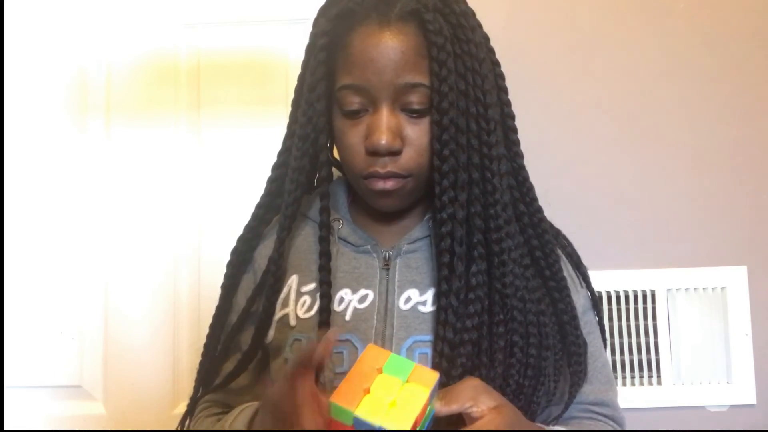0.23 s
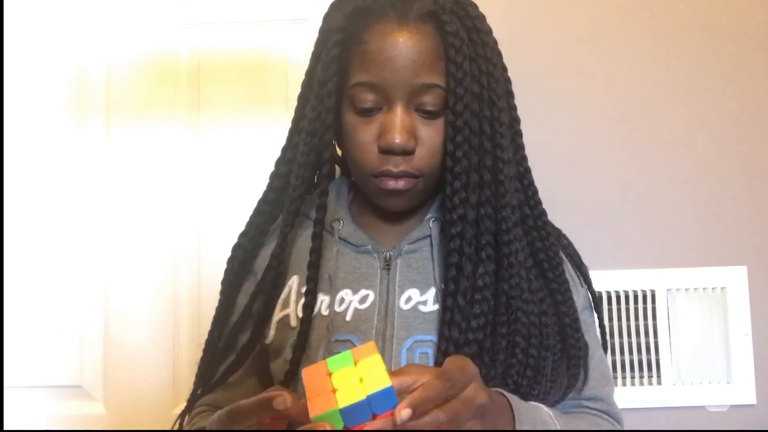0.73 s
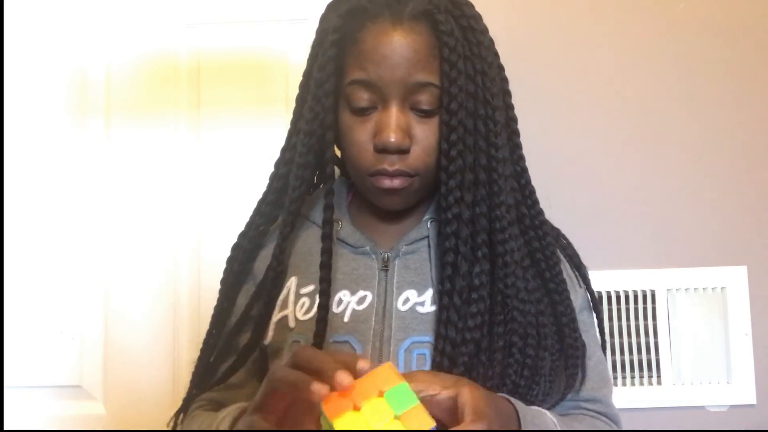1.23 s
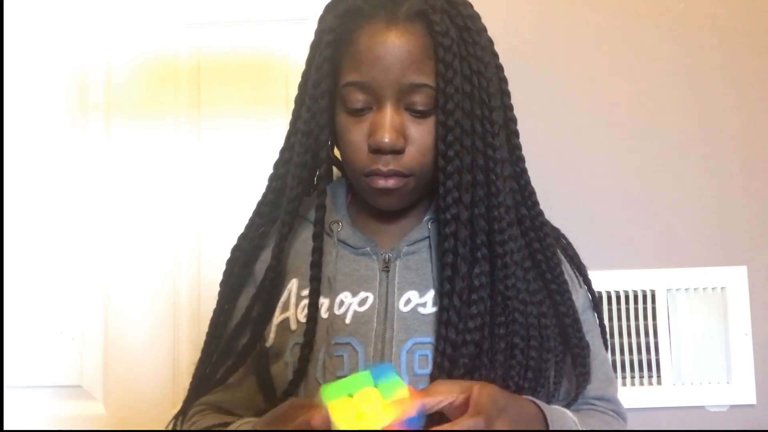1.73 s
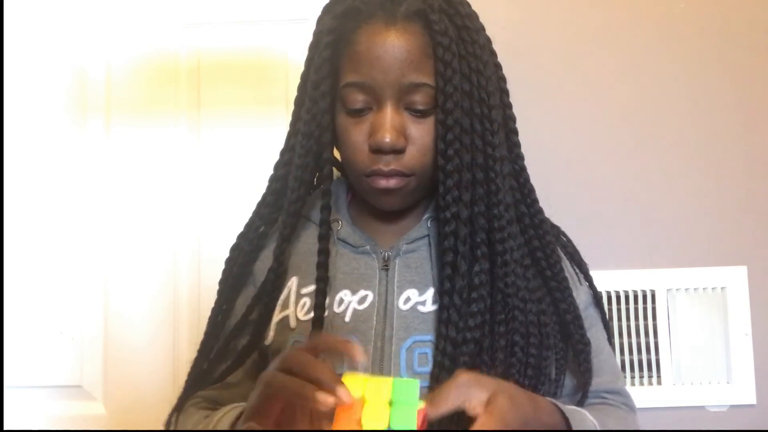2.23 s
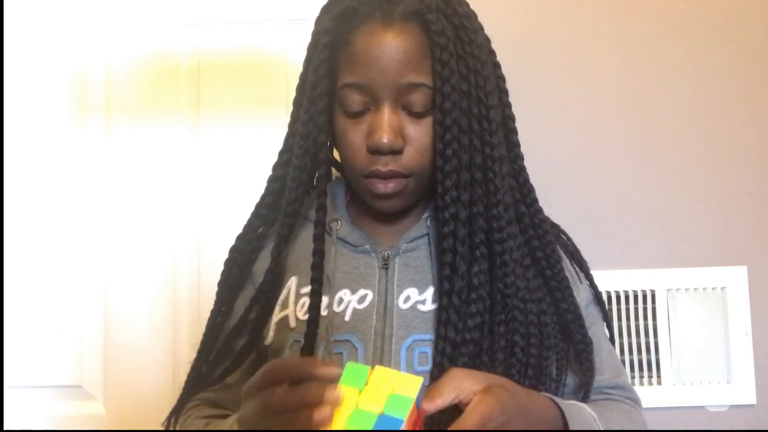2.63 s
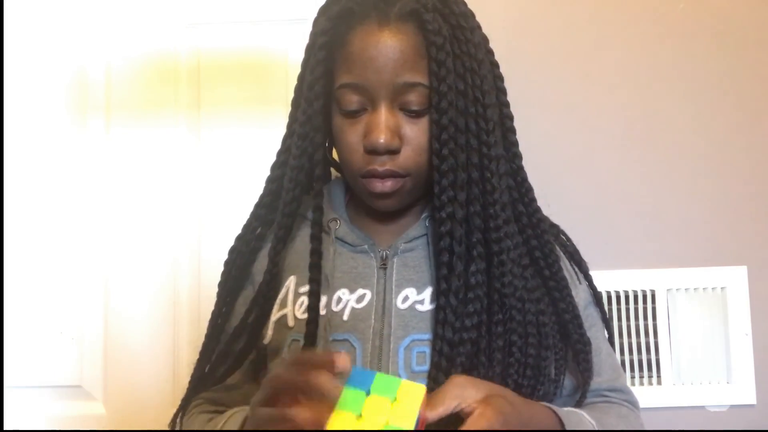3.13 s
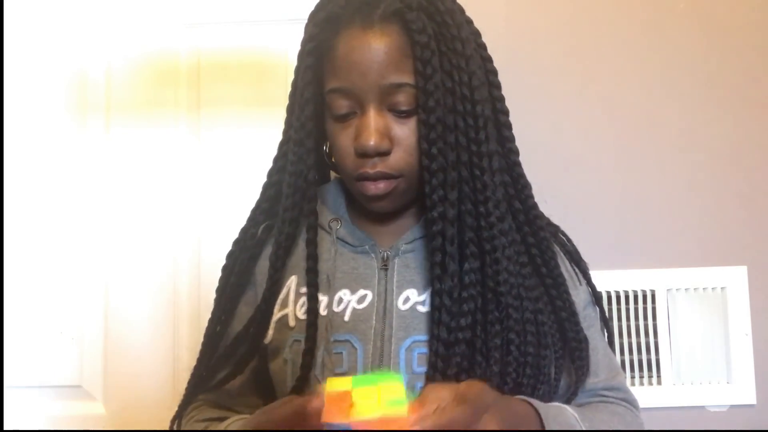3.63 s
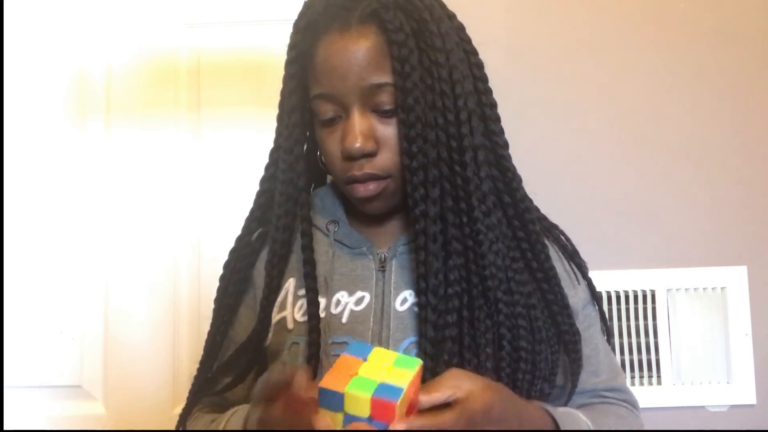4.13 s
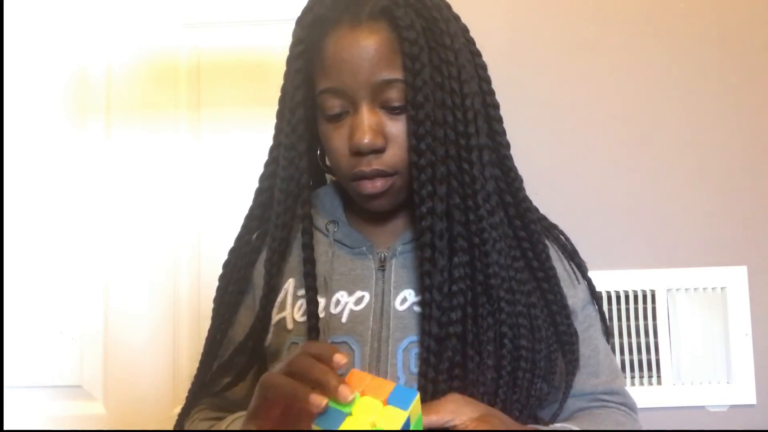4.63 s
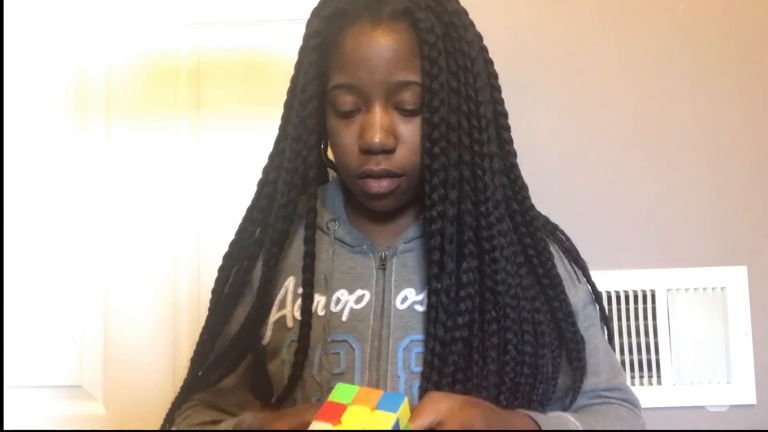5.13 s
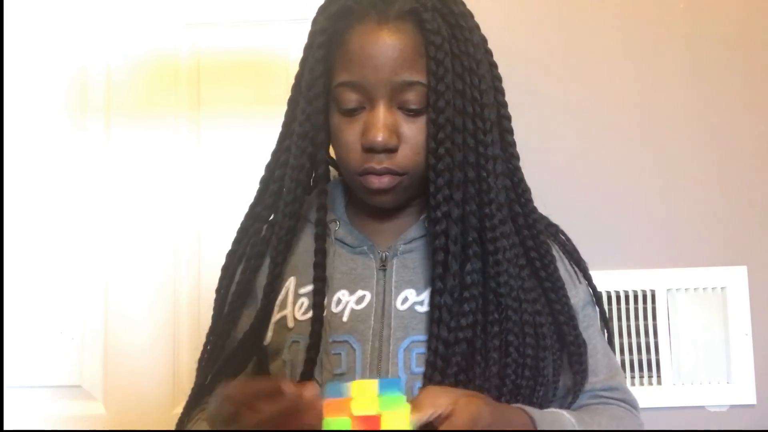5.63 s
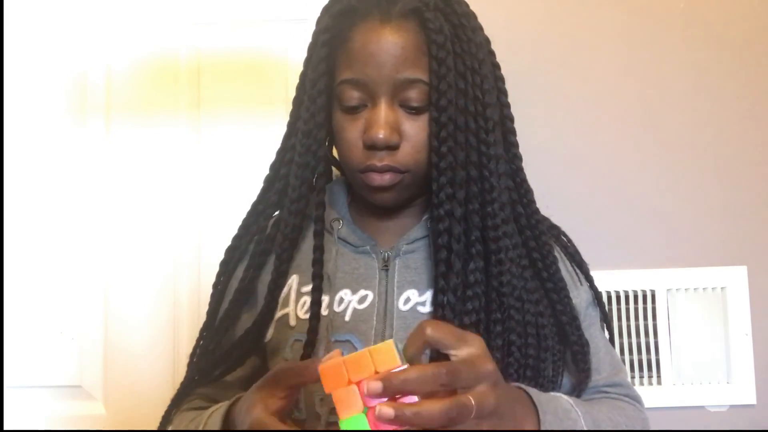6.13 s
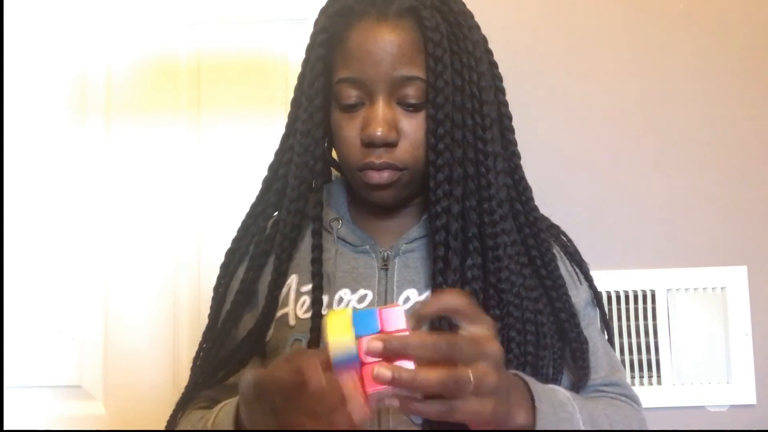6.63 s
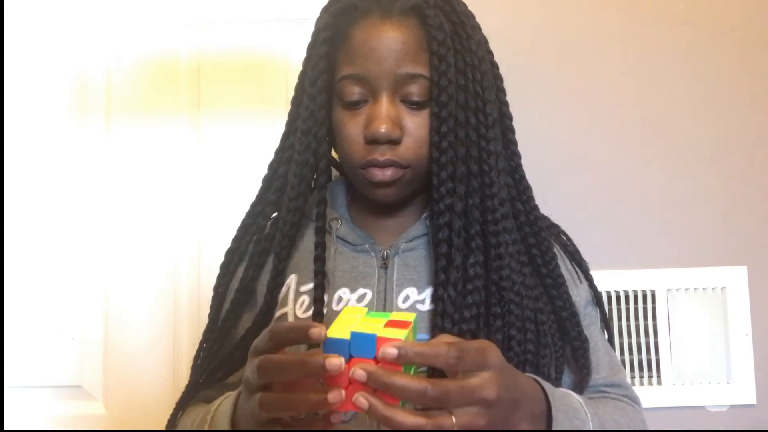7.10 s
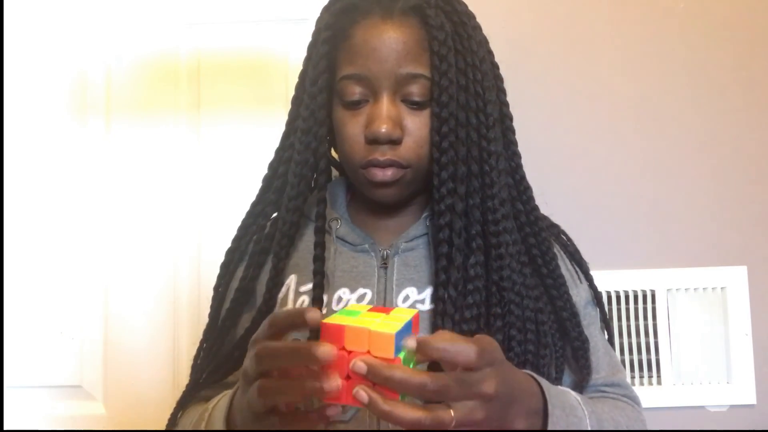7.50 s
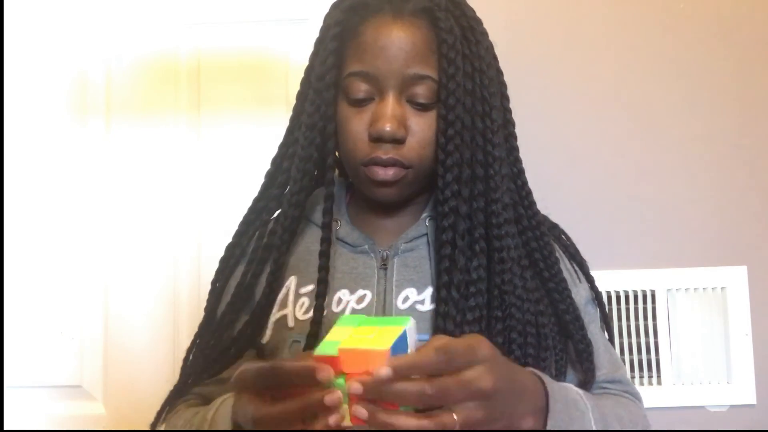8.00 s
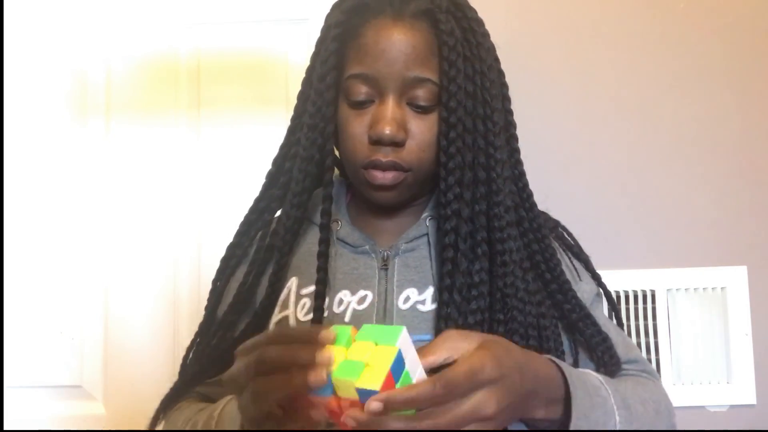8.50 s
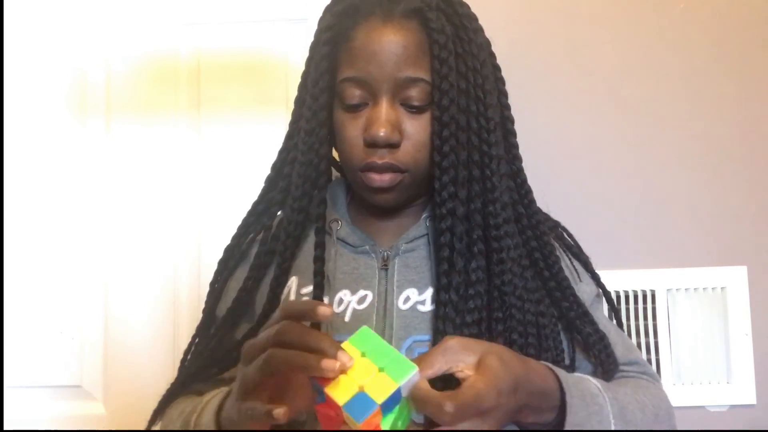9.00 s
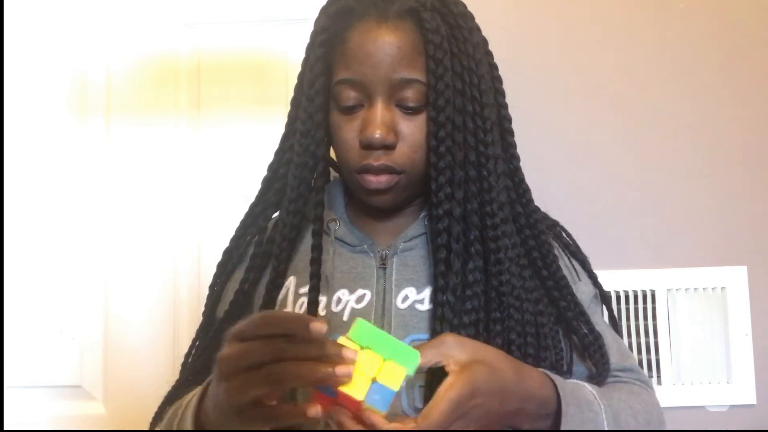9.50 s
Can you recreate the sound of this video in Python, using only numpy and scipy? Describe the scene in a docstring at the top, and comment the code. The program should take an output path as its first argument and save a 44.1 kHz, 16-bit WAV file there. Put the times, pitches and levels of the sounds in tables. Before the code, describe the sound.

Hands work a plastic speed cube indoors, heard very close. It starts nearly silent, with faint grip ticks over soft rumble. One quick turn clicks, then bursts of bright, dry clacks and scraping layer rattles come fast, pausing around four and a half, seven and seven and a half seconds. Hiss rises slightly during long flurries and a very faint low hum appears late. A lone sharp clack comes near the end.

```python
"""A low room rumble and thin hiss come first, with faint ticks of loose plastic as fingers shift their grip.
Then a plastic speed cube is solved in quick flurries, close to a small microphone in an ordinary room.
Each turn is a fine rattle of sliding pieces, made of tiny random contacts, with sharp noise-burst clacks
as pieces catch and seat; both are coloured by the plastic and answered by short, changing echoes.
The hiss, shaped noise, steps up during the long flurries; a faint wavering sine hums briefly late on."""
import sys
import numpy as np
from scipy import signal
from scipy.fft import rfft, irfft
from scipy.io import wavfile
from scipy.ndimage import uniform_filter1d

SR = 44100
rng = np.random.default_rng(int(sys.argv[2]) if len(sys.argv) > 2 else 0)


def wav_record(signal):
    """Record a signal, one row per channel, as 16-bit PCM in the file named by sys.argv[1]."""
    frames = np.transpose(np.atleast_2d(signal))
    bounded = np.clip(frames, -1, 1)
    # unit amplitude maps onto the largest positive 16-bit level
    quanta = np.round(bounded * 32767).astype(np.int16)
    wavfile.write(sys.argv[1], SR, quanta)


N = 429975  # length in samples


def amp(db):
    """Decibels to gain."""
    return 10 ** (np.asarray(db) / 20)


def evened(x):
    """Scales to rms 1."""
    return x / np.sqrt(np.mean(x ** 2) + 1e-20)


def read(points, hz):
    """Reads a table on a log-frequency axis."""
    f, value = np.transpose(points)
    return np.interp(np.log(hz + 1), np.log(f), value)


def add(mix, s, sound):
    """Mixes a sound in at time s."""
    part = mix[max(round(s * SR), 0):][:len(sound)]
    part += sound[:len(part)]


def noise(points):
    """Steady noise of the given colour, rms 1."""
    spectrum = rfft(rng.standard_normal(N))
    gain = amp(read(points, np.fft.rfftfreq(N, 1 / SR)))
    return evened(irfft(spectrum * gain, N))


# colour of the quiet background: [pitch_hz, relative_level_db_per_hz]
FLOOR_COLOUR = [(15, -37.5), (30, -16.5), (52, -3.5), (100, -5.5), (200, -15), (500, -19.5), (1100, -24),
                (2500, -30.5), (4200, -31.5), (4900, -36), (6300, -32), (10300, -41.5), (11800, -37.5),
                (16000, -39.5)]
FLOOR_DB = -52  # rms level of the background before its rumble swells
# stretches of louder hiss: [start_s, end_s, level_db]
HISS_SPANS = [(2.198, 4.405, -49), (5.263, 7.025, -48), (8.226, 9, -46.5)]
# colour of that hiss: [pitch_hz, relative_level_db_per_hz]
HISS_COLOUR = [(60, -0.5), (160, -1), (330, 1.5), (700, -4), (1500, -7), (3500, -9), (4900, -10.5),
               (6500, -9.5), (10300, -16.5), (11500, -17), (16000, -23.5)]


def background(fade_s=0.028, swell_db=0.5, rumble_hz=200):
    """An uneven room rumble under a thin hiss; the hiss steps up and drops back."""
    lift = np.zeros(N)
    for start, end, db in HISS_SPANS:
        length = end - start
        add(lift, start, amp(db) * signal.windows.tukey(round(length * SR), 2 * fade_s / length))
    air = amp(FLOOR_DB) * noise(FLOOR_COLOUR)
    lowpass = signal.butter(2, rumble_hz, fs=SR, output="sos")
    rumble = signal.sosfiltfilt(lowpass, air)
    wander = evened(uniform_filter1d(rng.standard_normal(N), size=6000))
    swell = amp(swell_db * wander)
    return air + (swell - 1) * rumble + lift * noise(HISS_COLOUR)


def causal(db):
    """Minimum-phase spectrum with this gain: it rings only after the blow."""
    log_gain = np.log(amp(db))
    circle = np.concatenate([log_gain, log_gain[-2:0:-1]])
    return np.exp(np.conj(signal.hilbert(circle)))[:len(db)]


# what the hollow plastic pieces radiate: [pitch_hz, relative_level_db_per_hz]
PLASTIC = [(100, -35), (300, -20.5), (550, -17), (820, -15.5), (1050, -6), (1900, -5), (3800, -3.5),
           (5000, -4), (6500, 1), (8500, -4), (9600, -7.5), (10300, -12.5), (11300, -10), (15800, -19)]
# broad resonances of the cube: [pitch_hz, width_hz, lift_db]
SHELL = [(660, 150, 7.5), (1400, 280, 1.5), (2850, 520, 4), (6430, 5400, 0.5)]


def cube(tilt_db, size=1024, pivot_hz=4500, low_hz=1400, high_hz=10000):
    """The cube's response; a harder contact tips it towards the treble, in dB per octave."""
    hz = np.fft.rfftfreq(size, 1 / SR)
    shell = sum(db / (1 + (2 * (hz - f) / width) ** 2) for f, width, db in SHELL)
    octaves = np.log2(np.clip(hz, low_hz, high_hz) / pivot_hz)
    return causal(read(PLASTIC, hz) + shell + tilt_db * octaves)


def ticks(per_s, spread_db, tilt_db, snap_s=.0006, count=20, size=1024):
    """A random train of tiny contacts of uneven size, spread over many pieces, rms 1."""
    decay = np.exp(-np.arange(size) / SR / snap_s)
    sizes = amp(spread_db * np.minimum(rng.exponential(1, N), 3))
    hits = (rng.random(N) < per_s / SR) * sizes
    piece = rng.integers(0, count, N)
    out = np.zeros(N)
    for k in range(count):
        burst = rng.standard_normal(size) * decay
        tick = irfft(rfft(burst) * cube(tilt_db))
        out += signal.oaconvolve(hits * (piece == k), evened(tick))[:N]
    return evened(out)


def handling(level_db=-69):
    """Loose pieces tick faintly as the fingers shift their grip."""
    return amp(level_db) * ticks(per_s=45, spread_db=-5.5, tilt_db=-0.5)


# the room's decay, as the time to fall 60 dB: [pitch_hz, t60_s]
ROOM_DECAY = [(300, 0.19), (3500, 0.21), (8000, 0.2), (15000, 0.17)]
# the colour of the room's diffuse tail: [pitch_hz, relative_level_db]
ROOM_COLOUR = [(200, 1.5), (1200, -3), (8500, -5), (11000, -6), (16000, -0.5)]


def echoes(early_db=-15, early_s=.0095, early_decay_s=0.0072, tail_db=-14, tail_s=.006):
    """A cluster of echoes from the nearest surfaces, and a short diffuse tail that dies by frequency."""
    t = np.arange(SR // 2) / SR
    # sparse random reflections
    near, far = rng.standard_normal((2, len(t))) * (rng.random((2, len(t))) < .12)
    near = near * np.exp(-t / early_decay_s)
    hz, age, z = signal.stft(far, SR, nperseg=256)
    colour_db = read(ROOM_COLOUR, hz)[:, None]
    decay_db = 60 * age / read(ROOM_DECAY, hz)[:, None]
    far = signal.istft(z * amp(colour_db - decay_db), SR, nperseg=256)[1]
    echo = np.zeros(SR // 2)
    add(echo, early_s, amp(early_db) * near / np.linalg.norm(near))
    add(echo, tail_s, amp(tail_db) * far / np.linalg.norm(far))
    return echo


def room(x, count=7):
    """The cube moves in the hands, so the sound crossfades round a ring of echo patterns."""
    place = np.arange(N) / SR * count / 2  # once round in 2 s
    shares = [np.sqrt(np.maximum(1 - abs((place - k) % count - 1), 0)) for k in range(count)]
    return sum(signal.oaconvolve(x * share, echoes())[:N] for share in shares)


def clacks(contacts, skid_db=-15, skid_s=0.0015, snap_s=0.0007, ring_s=0.0047, ring_db=-21,
           rise_s=0.00042, tilt_db=1.15, size=1536):
    """A piece skids, snaps home and its neighbours shiver. Rows: towards the microphone, into the room."""
    t = (np.arange(size) - size // 4) / SR
    out = np.zeros((2, N))
    age = np.maximum(t, 0)
    skid = amp(skid_db) * np.exp(-abs(t) / skid_s)
    shiver = amp(ring_db) * np.exp(-age / ring_s)
    strike = (1 - np.exp(-age / rise_s)) * (np.exp(-age / snap_s) + shiver)
    chatters = rng.standard_normal((len(contacts), size))
    for (s, db, bright), chatter in zip(contacts, chatters):
        colour = cube(bright + tilt_db, size=size)
        clack = irfft(rfft(chatter * (rng.random() * skid + strike)) * colour)
        loudest = np.sqrt(uniform_filter1d(clack ** 2, size=66).max())  # rms over 1.5 ms
        clack *= amp(db) / loudest
        add(out[0], s + t[0], clack)
        # summed over all directions the chatter's peaks and dips mostly even out, leaving the plastic's colour
        add(out[1], s, 0.66 * np.std(clack) * evened(irfft(colour)))
        add(out[1], s + t[0], 0.74 * clack)
    return out


# the clacks that stand out, as a layer catches or seats: [start_s, level_db, brightness_db_per_octave]
# level is that of the loudest moment; brightness comes before the tilt that all clacks share
CLACKS = [(.219, -40, -2.5), (.468, -48, -3.5), (0.656, -42, -1), (0.9983, -14.5, -5), (1.0128, -21, 9),
          (1.0276, -5.5, 2), (1.0411, -16.5, 0.5), (1.137, -32, -1), (1.19, -36.5, -6), (1.315, -38, -5.5),
          (1.423, -38, -0.5), (1.519, -16.5, -2), (1.56, -18.5, -2.5), (1.591, -11.5, -3.5),
          (1.638, -24, -2.5), (1.668, -23, -2.5), (1.759, -11.5, 3), (1.77, -2.5, 2), (1.789, -9, 2),
          (1.945, -24.5, -1.5), (1.97, -22.5, -3), (1.999, -13, 4.5), (2.008, -6.5, 1), (2.13, -6.5, -0.5),
          (2.1382, -11.5, -0.5), (2.181, -10, 1), (2.197, -4.5, 2), (2.2298, -3, 2), (2.317, -4, 4),
          (2.326, -4, 2), (2.337, -4.5, 4), (2.343, -5, 0.5), (2.4643, -18.5, -3.5), (2.486, -15, -1),
          (2.5923, -4, 13), (2.61, -2.5, 1.5), (2.6196, -7.5, -4), (2.652, -22.5, -3), (2.878, -18, -5),
          (2.894, -9.5, 1), (2.907, -7, 1), (2.92, -6, 0.5), (2.9911, -13.5, -4.5), (3.0175, -1.5, 0.5),
          (3.028, -6.5, 3), (3.225, -22.5, -2.5), (3.264, -16, -2.5), (3.288, -10.5, 1), (3.375, -28.5, -4),
          (3.4206, -10, 0), (3.465, -8, 2), (3.4744, -9, 1.5), (3.617, -12.5, -2), (3.67, -12.5, -1.5),
          (3.679, -11.5, 1.5), (3.688, -15, 4), (3.749, -23.5, -4), (3.7773, -10, 2), (3.818, -17, 0.5),
          (3.836, -19, -3.5), (3.863, -13.5, -1.5), (3.9302, -2, 3), (3.98, -1, 2.5), (4.362, -26.5, -4),
          (4.843, -45.5, -2), (5.037, -41, -2), (5.086, -40.5, 0), (5.12, -18.5, -5), (5.139, -21, -4),
          (5.217, -12.5, -0.5), (5.244, -10, 6), (5.256, -6.5, 2.5), (5.2639, -1.5, 1), (5.303, -20, -1),
          (5.536, -15.5, .5), (5.561, 2.5, 3.5), (5.643, -2.5, -.5), (5.6715, 1, 4), (5.6794, -9, 2),
          (5.883, -19, -4.5), (5.921, -14, -3.5), (5.928, -11.5, -5.5), (5.941, -4, -1),
          (5.954, -18.5, -2.5), (6.098, -10.5, -1), (6.122, -5.5, 1), (6.207, -29, -5.5),
          (6.252, -19.5, -5), (6.2877, -15.5, -4.5), (6.318, -12.5, -1.5), (6.337, -1.5, 0.5),
          (6.4111, -14.5, -4.5), (6.431, -20.5, -4.5), (6.466, -27, -7.5), (6.525, -8.5, -3),
          (6.546, -13, -3.5), (6.567, -13, -2.5), (6.592, -12.5, -.5), (6.6054, -5.5, 0),
          (6.6952, -19, -4.5), (7.24, -27, -10), (7.299, -10, 4), (7.318, -8, 1.5), (7.324, -1.5, -1.5),
          (7.34, -8.5, 4.5), (7.517, -42.5, 4), (7.553, -44.5, -5.5), (7.7963, -14.5, -3), (7.839, -14, -4),
          (7.846, -9, -1), (7.948, -15, -4), (7.98, -21, -3), (8.0896, -7, -4), (8.12, -3.5, 8.5),
          (8.132, -14, -5), (8.154, -20, 0), (8.2145, -12, 4), (8.235, -10, 3), (8.252, -18, 4),
          (8.268, -4, 1.5), (8.338, -19, -2.5), (8.371, -11, 3), (8.467, -32.5, -7), (8.496, -4.5, 0.5),
          (8.5092, -7.5, -1.5), (8.6613, -22, 2), (8.7651, -8.5, -4.5), (8.8233, -10, -3),
          (8.881, -16.5, -1), (8.927, -6, 2.5), (8.987, -10.5, 2), (9.139, -33.5, -4), (9.224, -43, -4),
          (9.431, -31.5, -4.5), (9.493, -31.5, -2), (9.599, -3, -1.5)]
BOUNCE_S, BOUNCE_DB = .0042, -9.5  # mean delay and level of the rebound, relative to its clack
GRAZE_S, GRAZE_DB = 0.0024, -17.5  # mean lead and level of the graze, relative to its clack


def rebounds():
    """Each piece grazes a neighbour on the way home, then springs back and touches again, more softly."""
    rows = []
    scatter = .5 + rng.random((len(CLACKS), 2))
    for (s, db, bright), (early, late) in zip(CLACKS, scatter):
        rows.append((s - GRAZE_S * early, db + GRAZE_DB, bright))
        rows.append((s + BOUNCE_S * late, db + BOUNCE_DB, bright))
    return rows


# a layer sliding round: [start_s, end_s, rattle_level_db], before the trim that all turns share
TURNS = [(.999, 1.041, -28), (1.405, 1.484, -62), (1.534, 1.615, -36), (1.721, 1.791, -26.5),
         (1.972, 2.032, -29.5), (2.115, 2.21, -33.5), (2.302, 2.354, -24), (2.455, 2.528, -38),
         (2.564, 2.636, -22), (2.886, 2.926, -20.5), (2.995, 3.034, -32.5), (3.245, 3.307, -50),
         (3.429, 3.471, -24), (3.58, 3.639, -34.5), (3.642, 3.702, -22.5), (3.773, 3.871, -29),
         (3.877, 3.961, -31), (3.978, 4.061, -37), (5.115, 5.169, -38), (5.208, 5.296, -20.5),
         (5.53, 5.58, -20), (5.654, 5.685, -17.5), (5.92, 5.95, -24), (5.975, 6.001, -45.5),
         (6.083, 6.156, -27), (6.245, 6.323, -31), (6.329, 6.354, -19), (6.419, 6.515, -41),
         (6.532, 6.616, -33.5), (6.629, 6.71, -32.5), (7.223, 7.29, -59), (7.298, 7.355, -24.5),
         (7.698, 7.79, -64), (7.811, 7.872, -28), (7.951, 8.004, -38.5), (8.086, 8.167, -21),
         (8.21, 8.284, -31.5), (8.336, 8.423, -29), (8.481, 8.544, -33), (8.58, 8.698, -35),
         (8.739, 8.845, -29.5), (8.854, 8.939, -34), (8.971, 8.995, -32), (9.06, 9.158, -63),
         (9.399, 9.436, -57.5), (9.56, 9.624, -30.5)]


def sliding(level_db=-3, nudge_db=-17, nudge_s=0.014):
    """The fingers nudge a layer loose; while it turns, its pieces rattle over the ones below."""
    t = np.arange(N) / SR
    pressure = np.zeros(N)
    for start, end, db in TURNS:
        swing = signal.windows.tukey(max(round((end - start) * SR), 2), .3)
        add(pressure, start, amp(db) * swing)
        pressure += amp(db + nudge_db) * np.exp(-np.minimum(abs(t - start) / nudge_s, 20))
    return amp(level_db) * pressure * ticks(per_s=650, spread_db=3.0, tilt_db=-1.4)


KNOCK_DB, KNOCK_SPREAD_DB = -23.5, 4  # level of a mid-swing knock in an ordinary turn; its scatter
KNOCK_FOLLOW, USUAL_RATTLE_DB = 0.61, -31  # dB of knock per dB of rattle; the ordinary turn's rattle
KNOCK_ENDS_DB = -2  # weaker as the layer starts and stops
KNOCK_TILT_DB, TILT_SPREAD_DB = -1, 4  # brightness in dB per octave; its scatter
HARDENING = .15  # rise in dB per octave with each dB of force


def knocks(count=6):
    """In every turn a few pieces bump past each other, louder and brighter in a hard turn and mid-swing."""
    rows = []
    for start, end, db in TURNS:
        swing = (np.arange(count) + rng.random(count)) / count  # uneven steps, 0 to 1
        force, tint = rng.standard_normal((2, count))
        force_db = KNOCK_FOLLOW * (db - USUAL_RATTLE_DB) + KNOCK_SPREAD_DB * force
        force_db += KNOCK_ENDS_DB * (2 * swing - 1) ** 2
        bright = KNOCK_TILT_DB + HARDENING * force_db + TILT_SPREAD_DB * tint
        rows += zip(start + (end - start) * swing, KNOCK_DB + force_db, bright)
    return rows


# a faint low hum that comes and goes: [time_s, pitch_hz, peak_level_db]
HUM = [(6.1, 70, -54), (6.85, 79.4, -54.5), (7.15, 92.2, -49), (7.351, 123.6, -54), (7.6, 125, -51.5),
       (8.05, 124.2, -47.5), (8.35, 116, -51.5), (8.8, 120.5, -76)]


def hum(waver=0.0242):
    """A low sine, its pitch wavering by a random fraction, comes in, swells and fades."""
    s, hz, db = np.transpose(HUM)
    t = np.arange(N) / SR
    drift = evened(uniform_filter1d(rng.standard_normal(N), size=3000))
    cycles = np.cumsum(np.interp(t, s, hz) * (1 + waver * drift)) / SR
    level = np.interp(t, s, amp(db), left=0, right=0)
    return level * np.sin(2 * np.pi * cycles)


def scene():
    """The cube in its room, over the background."""
    contacts = CLACKS + rebounds() + knocks()
    direct, spread = clacks(contacts) + sliding() + handling()
    return (direct + room(spread) + background() + hum())[None]


def record(dry, ceiling=0.87, edge_hz=16000):
    """The hardest clacks overload the input and clip; then a steep low-pass limits the band."""
    clipped = np.clip(dry, -ceiling, ceiling)
    lowpass = signal.firwin(401, edge_hz, window=("kaiser", 7), fs=SR)
    return signal.oaconvolve(clipped, lowpass[None], "same")


dry = scene()
out = record(dry)
wav_record(out)
```